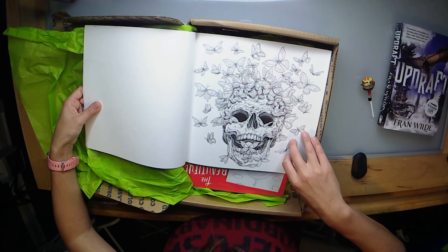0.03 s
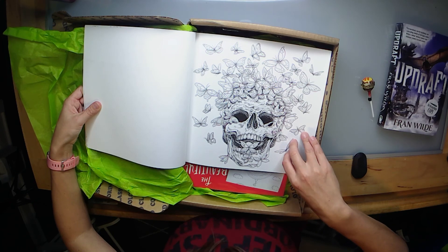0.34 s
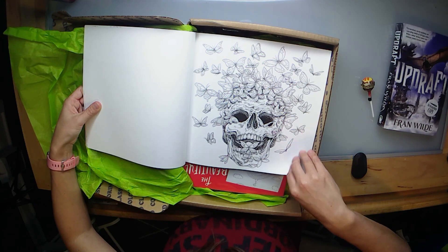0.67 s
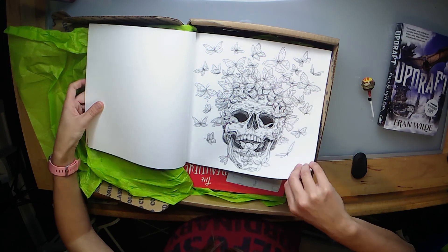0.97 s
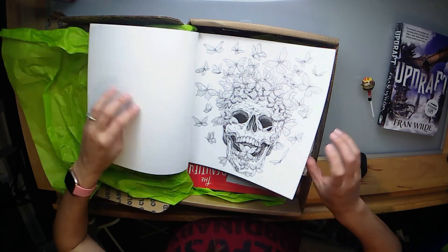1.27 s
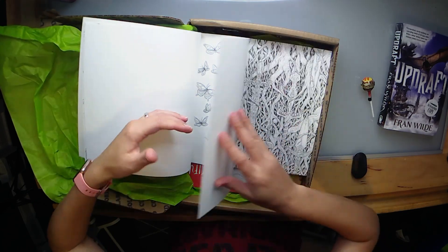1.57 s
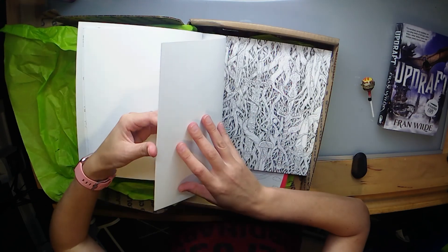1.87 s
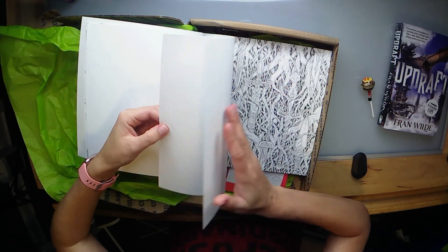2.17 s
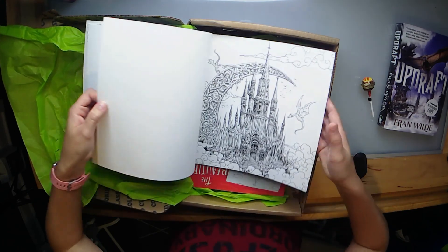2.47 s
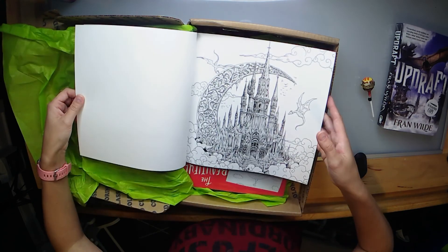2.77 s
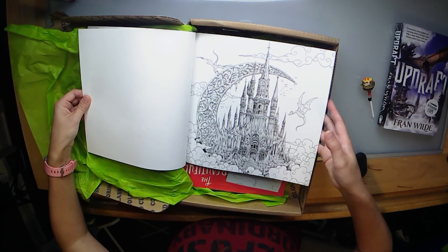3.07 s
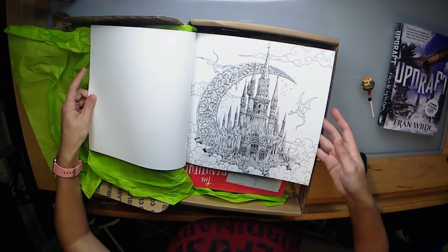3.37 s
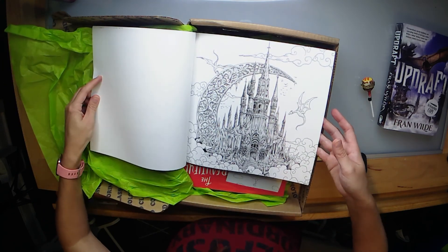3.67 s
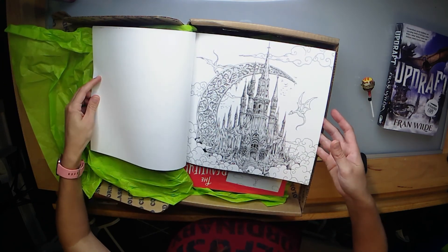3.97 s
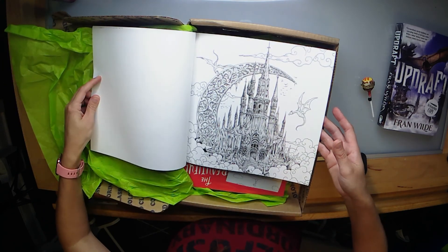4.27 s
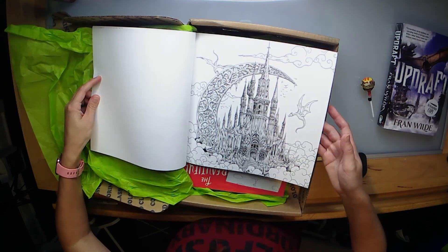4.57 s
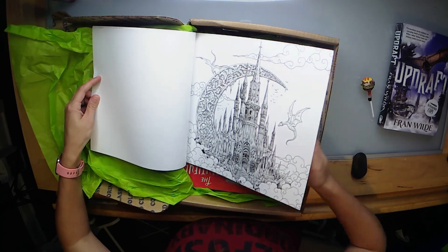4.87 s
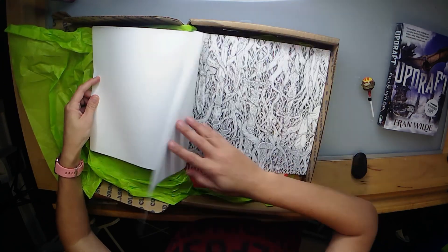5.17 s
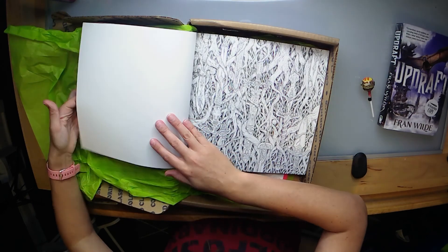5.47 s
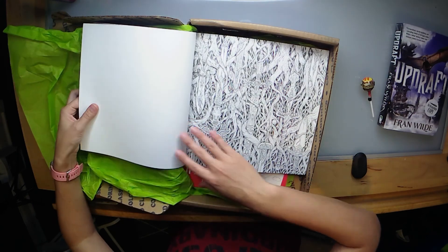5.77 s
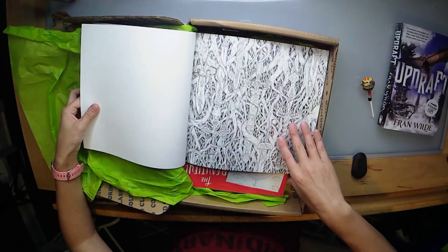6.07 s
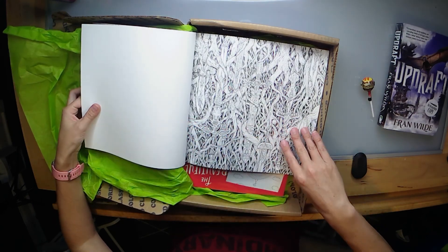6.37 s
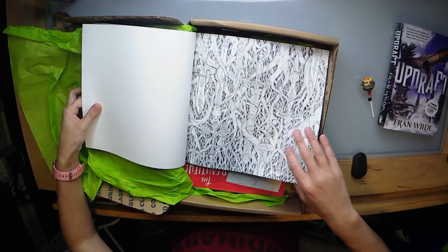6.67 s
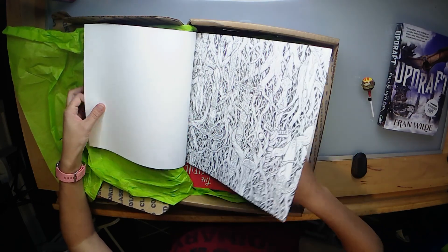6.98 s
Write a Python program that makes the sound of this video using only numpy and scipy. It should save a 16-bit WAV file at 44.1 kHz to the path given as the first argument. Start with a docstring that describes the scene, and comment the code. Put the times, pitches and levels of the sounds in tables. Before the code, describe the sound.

Large book pages are handled close to the microphones in a quiet room, with faint steady air noise underneath. Fingers brush lightly over paper at first. At about 0.8 seconds a sheet lifts with a sharp snap and a dry rustle, then flops softly around 1.5 seconds. More sliding swishes and small crisp snaps follow from about 2 to 3.4 seconds as the pages turn and settle. Only faint touches and ticks remain until nearly 5 seconds, when another page swishes over, crackling and landing by 5.5 seconds. A hand smooths the paper with soft rubs. Around 6.5 seconds a page edge whispers over the fingers with one faint fingertip squeak, and near 6.9 seconds the next sheet bends with a rustle and a low flop. The paper sounds mostly from the right, with a slight short room echo.

```python
"""Turning colouring book pages

Large pages are lifted, turned and smoothed by hand on a desk in a quiet room. Sliding paper rustles in
tiny stick-slip clicks, the sheets snap and flop as they bend, edges whisper over fingers, and a
fingertip squeaks faintly. The scene is heard from two close microphones above the desk."""
import sys
import numpy as np
from scipy import signal
from scipy.fft import rfft, irfft, next_fast_len
from scipy.io import wavfile

SR = 44100
rng = np.random.default_rng(int(sys.argv[2]) if len(sys.argv) > 2 else 0)


def store_pcm(level_fs):
    """Save levels as 16-bit WAV."""
    pcm = np.round(np.clip(level_fs, -1, 1) * 32767).astype(np.int16)
    wavfile.write(sys.argv[1], SR, np.atleast_2d(pcm).T)


N = 309978
TIME, FREQS = np.arange(N) / SR, np.fft.rfftfreq(N, 1 / SR)

# Where the paper is handled. Each row: time in seconds, side from -1 (left) to 1 (right).
PAN_PATH = [(0, -0.38), (.55, -0.12), (.75, 0.66), (1.1, 0.58), (1.5, 0.82), (2.3, 0.83), (3.4, 0.82),
            (3.7, 1), (4.36, 0.82), (4.7, 0.51), (5.1, 0.69), (5.9, 0.8), (6.4, 0.14), (6.6, -0.15),
            (6.9, 0.46)]


def amp(db):
    """Decibels to gain."""
    return 10 ** (np.asarray(db) / 20)


def unit(x):
    """Scales to rms 1."""
    return x / np.sqrt(np.mean(x ** 2) + 1e-20)


def curve_at(points, hz):
    """Reads a curve on a log-frequency axis."""
    f, value = np.transpose(points)
    return np.interp(np.log(hz + 1), np.log(f + 1), value)


def pan():
    """The side the paper sounds from, at every sample."""
    return np.interp(TIME, *np.transpose(PAN_PATH))


def delayed(x, s):
    """The same sound s seconds later."""
    return np.interp(TIME - s, TIME, x, left=0)


def sharp_impulse(db):
    """Impulse response with the given spectrum and the sharpest possible attack."""
    log_gain = np.log(amp(np.r_[db, db[-2:0:-1]]))
    return np.fft.ifft(np.exp(np.conj(signal.hilbert(log_gain)))).real


def wander(rate_hz):
    """Smooth random drift of rms 1."""
    pole = np.exp(-2 * np.pi * rate_hz / SR)
    return unit(signal.lfilter([1], np.poly([pole, pole]), rng.standard_normal(N)))


def diffuse(pair):
    """Two unrelated signals become a diffuse field at close microphones: alike in the bass."""
    # Stereo likeness. Each row: frequency in Hz, left-right correlation.
    likeness = [(50, 1), (300, 0.15), (700, -0.23), (1400, -0.0029), (2500, 0.15), (4000, 0.28),
                (8000, -0.075)]
    size = pair.shape[1]
    a, b = rfft(pair)
    same = np.clip(curve_at(likeness, np.fft.rfftfreq(size, 1 / SR)), -1, 1)
    return irfft(np.array([a, same * a + np.sqrt(1 - same ** 2) * b]), size)


def room_tone(level_db=-60.5):
    """Steady air noise of the room with faint microphone hiss."""
    # Colour of the air. Each row: frequency in Hz, relative level in dB.
    air_eq = [(15, -39), (25, -20), (79, -14.5), (104, -7.5), (204, -6), (281, -4.5), (421, -4.5),
              (482, -7.5), (598, -11), (666, -9), (1110, -13), (1530, -9.5), (1660, -10.5), (4750, -23),
              (15500, -26.5)]
    size = next_fast_len(N)
    colour = amp(curve_at(air_eq, np.fft.rfftfreq(size, 1 / SR)))
    noise = irfft(rfft(rng.standard_normal((2, size))) * colour, size)
    return amp(level_db) * unit(diffuse(noise)[:, :N])


def swell_db(peak_s, rise_s, fall_s, drop_db=9.5, roundness=1.35):
    """A stroke speeds up, then slows: drop_db down one rise before and one fall after its peak."""
    t = TIME - peak_s
    away = np.minimum(np.maximum(-t / rise_s, t / fall_s), 8)
    return -drop_db * away ** roundness  # 1 = pointed, 2 = bell


def handling(rest_rub_db=-70.5, rest_flex_db=-79.5, rest_fizz_db=-81.5):
    """Envelopes of rub, flex and fizz: strokes add in power to resting hands that never keep still."""
    # A sheet slides, swings or flops down. Each row: peak time, rise and fall in seconds,
    # envelope level in dB, flex and fizz offsets from that level in dB.
    sheet_moves = [(0.798, 0.055, 0.039, -39, -6, -9.5), (0.962, 0.083, .075, -39, -5.5, -10),
                   (1.15, 0.33, 0.22, -47, -8, -7), (1.285, 0.048, 0.062, -49, -3, -13),
                   (1.534, 0.022, 0.07, -53, 5, -12), (1.86, 0.15, 0.089, -68, -12, 6.5),
                   (2.27, 0.22, 0.2, -45.5, -8, -13.5), (2.39, 0.012, 0.061, -54, 7.5, -1),
                   (2.58, 0.11, 0.24, -43.5, -3.5, -13), (2.838, 0.035, 0.059, -39.5, -7.5, -22),
                   (2.99, .08, 0.06, -46.5, -7.5, -7), (3.05, 0.053, 0.18, -47.5, -2.5, -11),
                   (3.279, 0.032, 0.028, -41, -5, -8.5), (4.98, 0.25, 0.32, -58, -4.5, -0.5),
                   (5.098, 0.032, 0.098, -38.5, -13.5, -6), (5.176, 0.037, .075, -37, -6.5, -14),
                   (5.29, 0.034, 0.079, -48, 1.5, -20), (5.39, 0.14, 0.16, -44.5, -4.5, -35),
                   (6.82, 0.048, 0.072, -38.5, -20, -8), (6.885, 0.071, 0.051, -41, 2, -3.5),
                   (7.03, .1, .1, -47.5, -4, -13)]
    # A hand brushes, grips or smooths the paper. Same columns.
    hand_rubs = [(0.02, 0.11, 0.047, -62.5, -2, -7.5), (0.125, 0.037, 0.18, -68, 8.5, -19),
                 (0.485, 0.063, 0.071, -52.5, -13, -5.5), (0.518, 0.021, 0.021, -43, -5.5, -16),
                 (0.65, 0.084, 0.33, -52.5, -4.5, -8), (1.68, 0.094, 0.12, -53.5, -4, -17),
                 (1.975, 0.071, 0.066, -51.5, -6.5, -30), (3.18, 0.096, 0.092, -46.5, -15, -12.5),
                 (3.364, 0.085, 0.064, -46, -5.5, -13), (3.5, 0.15, 0.11, -60.5, -5, -17),
                 (3.76, 0.37, 0.14, -82, 15, 3), (4.01, 0.052, 0.046, -59, -11, -13),
                 (4.385, 0.056, 0.11, -59.5, -6, -16), (4.57, 0.044, 0.17, -64.5, -0.5, -3),
                 (5.494, 0.069, 0.091, -49, -4.5, -4.5), (5.675, .07, 0.07, -48.5, -15, -19),
                 (5.865, 0.1, 0.15, -54, -4.5, -10), (6.04, 0.05, 0.084, -59, -1, -12),
                 (6.15, 0.097, 0.2, -58.5, -2, -18), (6.375, 0.049, 0.038, -52.5, -19, -9.5),
                 (6.468, 0.057, 0.13, -44.5, -16.5, -15), (6.605, 0.045, 0.083, -50.5, -16, -13),
                 (6.74, 0.14, 0.076, -49, -8, -30)]
    power = amp([[rest_rub_db], [rest_flex_db], [rest_fizz_db]]) ** 2 * np.ones(N)
    for peak_s, rise_s, fall_s, level_db, flex_db, fizz_db in sheet_moves + hand_rubs:
        stroke = amp(level_db + swell_db(peak_s, rise_s, fall_s))
        power += (amp([[0], [flex_db], [fizz_db]]) * stroke) ** 2
    return np.sqrt(power)


def slips(eq, per_s, spread_db, clump_db, clump_hz, hiss):
    """Tiny stick-slip clicks of uneven size come in clumps and sound through the book."""
    # Resonances of the open book. Each row: frequency in Hz, width in Hz, boost in dB.
    book_modes = [(363, 8.1, 5.5), (480, 175, 5.5), (566, 16, 3.5), (837, 140, 0.5), (1270, 69, 6),
                  (1404, 57, 6), (1570, 130, -3), (1770, 270, 0), (2690, 410, 5.5)]
    sizes = amp(spread_db * np.minimum(rng.exponential(1, N), 4)) * rng.choice([-1, 1], N)
    clicks = unit(sizes * (rng.random(N) < per_s / SR)) + hiss * rng.standard_normal(N)
    clicks *= amp(clump_db * wander(clump_hz))
    hz = np.fft.rfftfreq(4096, 1 / SR)
    ring_db = sum(boost / (1 + (2 * (hz - f) / width) ** 2) for f, width, boost in book_modes)
    return unit(signal.oaconvolve(clicks, sharp_impulse(curve_at(eq, hz) + ring_db))[:N])


def rustle(rub_db=-1.0, flex_db=-1.5, fizz_db=-4, crackle_db=-14):
    """Paper slides on paper: a mid rub, the low flex of the sheet, dry fibre fizz and sparse crackles."""
    # The three voices of the paper. Each row: frequency in Hz, relative level in dB.
    rub_eq = [(300, -31), (600, -15.5), (850, 3), (1100, -1.5), (1900, 4.5), (2900, -3), (3500, -8),
              (4500, -13), (6500, -23.5), (15000, -28.5)]
    flex_eq = [(30, -26), (70, -15), (125, -6), (210, -9.5), (320, -6), (480, 0), (600, 0), (850, -7.5),
               (2000, -40.5)]
    fizz_eq = [(1500, -36.5), (3200, 9), (4500, 10.5), (6000, 7), (8000, 0), (11000, -2), (13500, -0.5),
               (15500, -17)]
    rubbing, flexing, fizzing = handling()
    rub = amp(rub_db) * slips(rub_eq, per_s=1500, spread_db=4, clump_db=2, clump_hz=59, hiss=0.97)
    flex = amp(flex_db) * slips(flex_eq, per_s=560, spread_db=1.5, clump_db=2, clump_hz=41, hiss=0.77)
    fizz = amp(fizz_db) * slips(fizz_eq, per_s=2000, spread_db=4.5, clump_db=3.2, clump_hz=60, hiss=0.9)
    crackles = amp(crackle_db) * slips(fizz_eq, per_s=70, spread_db=6, clump_db=3, clump_hz=60, hiss=0)
    return rubbing * rub + flexing * flex + fizzing * (fizz + crackles)


def friction(stroke, flutter_db):
    """Fluttering friction noise in a resonance that glides with the free length of the page."""
    peak_s, rise_s, fall_s, level_db, peak_hz, glide, width_hz = stroke
    swell = swell_db(peak_s, rise_s, fall_s)
    audible = swell > -40
    hz = peak_hz * 2 ** (glide * (TIME[audible] - peak_s))
    phase = 2 * np.pi * np.cumsum(hz) / SR
    pole = np.exp(-np.pi * width_hz / SR)
    real, imag = signal.lfilter([1], np.poly([pole, pole]), rng.standard_normal((2, N)))[:, audible]
    band = unit(real * np.cos(phase) + imag * np.sin(phase))  # low noise shifted up to the resonance
    out = np.zeros(N)
    out[audible] = amp(level_db + swell[audible] + flutter_db * wander(70)[audible]) * band
    return out


def edge_slides():
    """Page edges whisper over fingers or the next sheet, and a fingertip squeaks once."""
    # Broad edge whispers. Each row: peak time, rise and fall in seconds, level in dB,
    # resonance in Hz, glide in octaves per second, width in Hz.
    whispers = [(0.21, .2, 0.077, -64, 2100, 1.5, 700), (1.96, 0.059, .04, -53.5, 2870, -0.2, 600),
                (2.08, .1, 0.1, -56, 2650, -.6, 600), (2.28, .16, .12, -55, 1990, -1.7, 600),
                (2.28, .24, 0.065, -50.5, 771, -1.5, 430), (5.05, .26, 0.085, -51.5, 2400, 0.8, 950),
                (5.37, .075, 0.036, -43, 1383, 2, 500), (6.462, 0.016, 0.026, -42.5, 2200, -0.4, 1110),
                (6.535, .02, 0.019, -42.5, 2220, 0.5, 700), (6.6, .025, 0.022, -45.5, 1960, -3.5, 600),
                (6.66, 0.052, 0.052, -48.5, 930, -2.5, 330), (6.9, 0.0248, 0.078, -44.5, 620, -1, 220)]
    # The narrow fingertip squeak. Same columns.
    squeaks = [(6.48, .045, 0.11, -57, 4574, -.1, 420)]
    edges = sum(friction(stroke, flutter_db=0.6) for stroke in whispers)
    return edges + sum(friction(stroke, flutter_db=3) for stroke in squeaks)


def snaps(trim_db=-1.0, crisp_hz=4000, crumple_db=-2, crumple_s=0.0055, softening=0.17, usual_db=-28.5):
    """A sheet buckles or lands and rings a patch of paper: hard snaps are clean, soft ones crumple."""
    # Snaps and flops of the sheets, pats and taps of the hands. Each row: start in seconds,
    # relative level in dB, pitch in Hz, sharpness of the ring as Q, treble shelf in dB.
    hits = [(0.136, -34, 497, 0.95, 3), (0.403, -43, 760, 4.2, 4), (0.5026, -24.5, 900, 0.17, 2),
            (0.518, -24, 800, 0.2, -3), (0.6355, -30.5, 2000, 1, 2), (0.8, -21.5, 2000, .46, 21),
            (0.8246, -8, 950, 0.61, -14), (0.901, -25.5, 480, 1, 0), (1.0959, -23, 1010, 0.35, -5),
            (1.4926, -24, 780, 0.55, -2.5), (1.498, -37, 1006, .7, 2), (1.524, -34, 386, 5.2, 4),
            (1.54, -40, 243, 9.2, 0), (1.947, -27.5, 2640, 2.6, -8), (2.3747, -24, 800, 0.47, -8),
            (2.384, -35, 152, 4, -2), (2.383, -28.5, 400, 1, -6), (2.6219, -19, 3000, 3.2, -21),
            (2.627, -20.5, 2600, 0.88, 17), (2.8162, -19, 2720, 1.6, 1), (2.8426, -26, 1700, .7, -6),
            (2.9166, -23.5, 3000, 0.56, 5), (2.958, -28.5, 1810, 1.5, 6), (3.046, -24, 593, 0.21, 8),
            (3.391, -31.5, 1400, 1.3, -10), (3.5056, -30.5, 2000, 0.99, 13), (3.679, -33.5, 1980, .43, 9),
            (3.881, -40, 2600, 1.4, 8), (3.9948, -37, 2000, .56, -2), (4.3605, -31.5, 1450, 3.7, -9),
            (4.3624, -30, 1360, 3, -9), (4.389, -39.5, 1240, 9.8, -3), (5.0002, -28.5, 1500, 0.3, 7),
            (5.018, -25.5, 1830, 2.6, -4), (5.1597, -19, 1200, .43, 11.5), (5.2746, -21, 1280, 0.65, -1),
            (5.289, -21.5, 1500, 0.56, 8), (5.378, -19.5, 1390, .74, -2), (5.4013, -16.5, 1270, 1.05, 4.5),
            (5.472, -24, 1950, .71, -4), (5.4889, -20, 1080, 0.44, 0), (5.6616, -29, 1200, .4, 17),
            (5.706, -30.5, 1800, 0.57, 17), (5.7985, -31.5, 1740, 1.5, 9), (5.8344, -32.5, 1600, .6, 4),
            (5.944, -26.5, 1880, 0.28, 3.5), (6.2774, -36.5, 2800, 0.68, -1), (6.576, -23.5, 2200, 0.8, 9),
            (6.877, -20.5, 557, 1.9, -7), (6.879, -26.5, 326, 9.8, 6.5), (6.888, -19.5, 680, 2.5, 1),
            (6.901, -28, 560, 2.8, 0), (6.938, -39, 247, 23, -3)]
    # Colour of every snap. Each row: frequency in Hz, gain in dB.
    snap_eq = [(30, -12), (200, -7), (400, 1.5), (2300, 0), (3000, 1.5), (3700, -6), (6000, -9),
               (13000, -19.5), (16000, -10)]
    hz, t, out = np.fft.rfftfreq(4096, 1 / SR) + 1, np.arange(1024) / SR, np.zeros(N)
    creases = rng.standard_normal((len(hits), len(t))) * np.exp(-t / crumple_s)
    for (start_s, level_db, pitch, q, crisp_db), crease in zip(hits, creases):
        patch_db = -10 * np.log10(1 + (q * (hz / pitch - pitch / hz)) ** 2)
        shelf_db = crisp_db / (1 + (crisp_hz / hz) ** 4)
        ring = sharp_impulse(patch_db + curve_at(snap_eq, hz) + shelf_db)
        crumple = amp(crumple_db + softening * (usual_db - level_db))
        push = (t == 0) + crumple * crease / np.linalg.norm(crease)  # one click, then tiny creases
        snap = signal.fftconvolve(ring / abs(ring).max(), push / np.linalg.norm(push))
        slot = out[round(start_s * SR):][:len(snap)]
        slot -= amp(level_db + trim_db) * snap[:len(slot)]
    return out


def room_tail(build_s=0.00032):
    """One diffuse stereo room response, treble dying first."""
    # Reverb time. Each row: frequency in Hz, seconds to fall 60 dB.
    decay_times = [(100, 0.65), (500, 0.49), (2000, 0.22), (6000, 0.16), (15000, 0.14)]
    # Treble arrives mostly by scattering. Each row: frequency in Hz, gain in dB.
    tail_eq = [(150, -12), (500, -7.5), (1500, -5.5), (4000, 0), (12000, 3)]
    size = SR // 3
    hz, when, spectra = signal.stft(rng.standard_normal((2, size)), SR, nperseg=256)
    fall_db = -60 * when / curve_at(decay_times, hz)[:, None]
    spectra *= amp(fall_db + curve_at(tail_eq, hz)[:, None])
    tail = signal.istft(spectra, SR, nperseg=256)[1][:, :size]
    tail = diffuse(tail * (1 - np.exp(-np.arange(size) / SR / build_s)))
    return tail / np.linalg.norm(tail[0])


def room(direct, send, mic_delay_s=4 / SR, tails=5, fades_per_s=35):
    """Sound reaches the far microphone later; crossfading tails mimic paths shifting with the sheet."""
    late = delayed(direct, mic_delay_s)
    on_right = np.clip(.5 + 2 * pan(), 0, 1)
    out = on_right * np.array([late, direct]) + (1 - on_right) * np.array([direct, late])
    for k in range(tails):
        away = abs((TIME * fades_per_s - k + tails / 2) % tails - tails / 2)
        share = np.cos(np.pi / 2 * np.minimum(away, 1))
        out += signal.oaconvolve((send * share)[None], room_tail(), axes=1)[:, :N]
    return out


def scene(sliding_wet_db=1, snap_wet_db=-1.0):
    """The paper sounds from either side of the book; desk and walls throw its snaps back."""
    # Early reflections. Each row: delay in seconds, gain in dB.
    reflections = [(.0027, -31), (.0068, -18), (.0138, -35), (0.03, -9), (.04, -26)]
    # Balance of a sound from the right. Each row: frequency in Hz, left minus right in dB.
    balance = [(60, -2.5), (400, -1.3), (1100, -6), (2200, -4.5), (4200, 3.5), (8000, -4), (13000, 0)]
    sliding, hits = rustle() + edge_slides(), snaps()
    echoes = sum(amp(db) * delayed(hits, s) for s, db in reflections)
    send = amp(sliding_wet_db) * sliding + amp(snap_wet_db) * hits
    paper = room(sliding + hits + echoes, send)
    lean_db = curve_at(balance, FREQS) / 2
    from_right = irfft(rfft(paper) * amp([lean_db, -lean_db]), N)
    return paper + pan() * (from_right - paper) + room_tone()


def record(dry):
    """A steep low-pass takes off the very top of the treble."""
    lowpass = signal.firwin(511, cutoff=15800, window=("kaiser", 9), fs=SR)
    return signal.oaconvolve(dry, lowpass[None], "same")


dry = scene()
out = record(dry)
store_pcm(out)
```